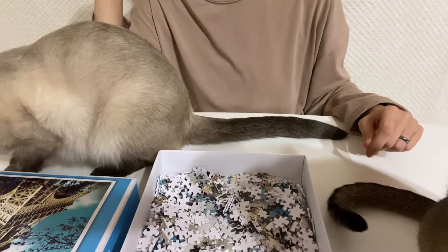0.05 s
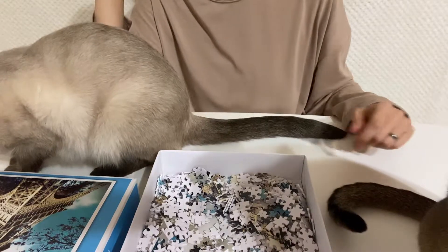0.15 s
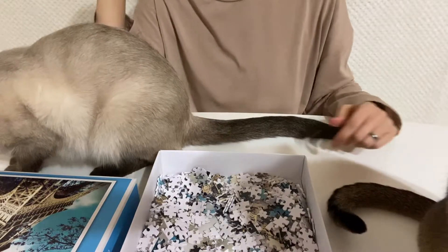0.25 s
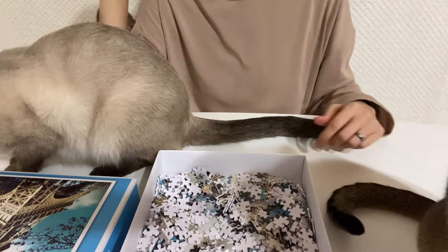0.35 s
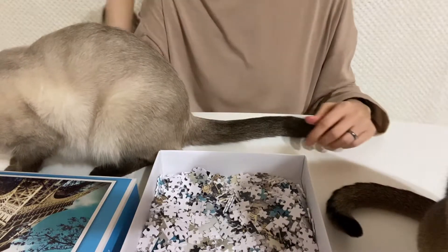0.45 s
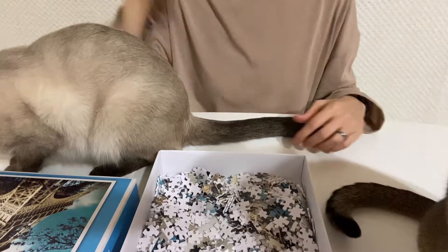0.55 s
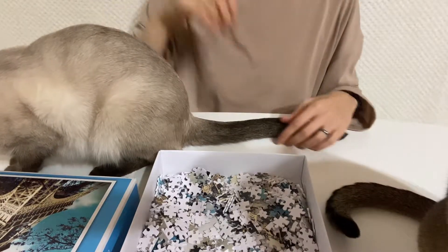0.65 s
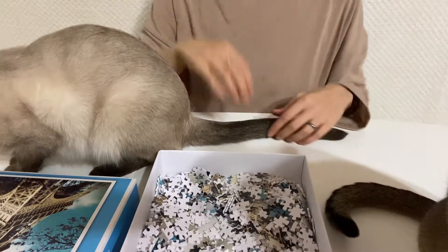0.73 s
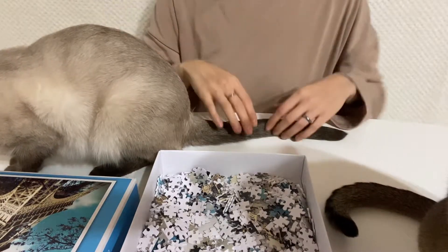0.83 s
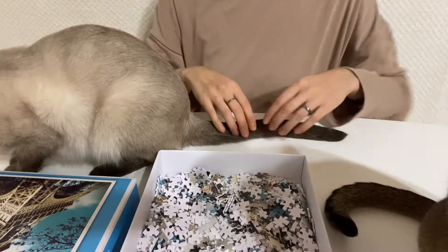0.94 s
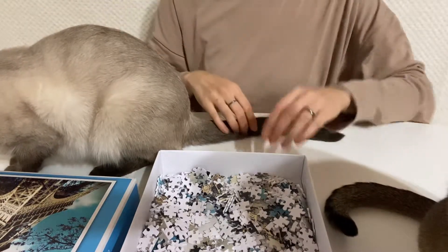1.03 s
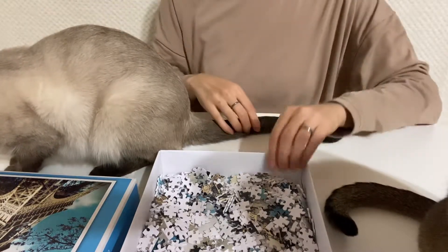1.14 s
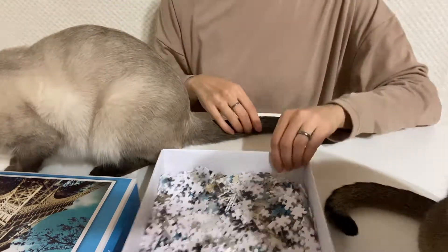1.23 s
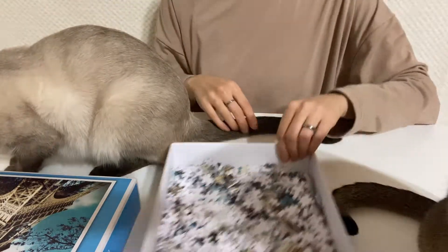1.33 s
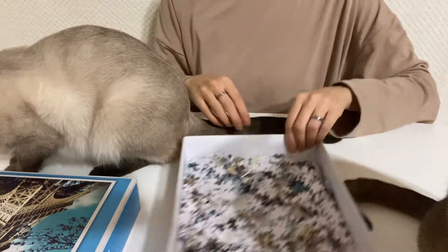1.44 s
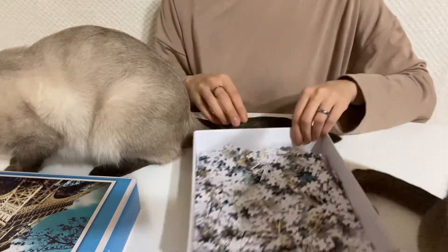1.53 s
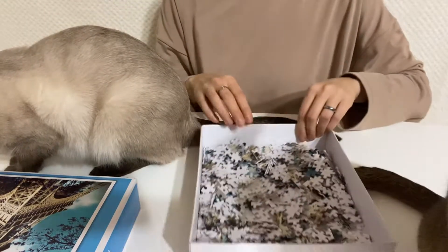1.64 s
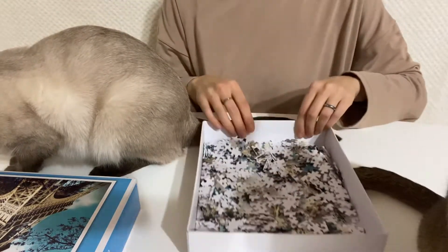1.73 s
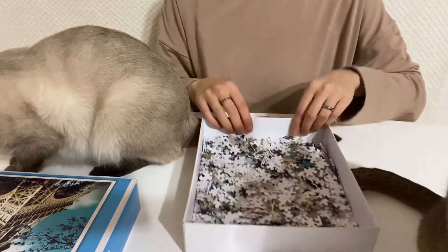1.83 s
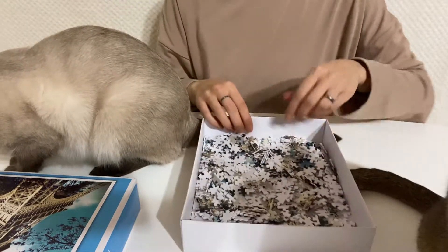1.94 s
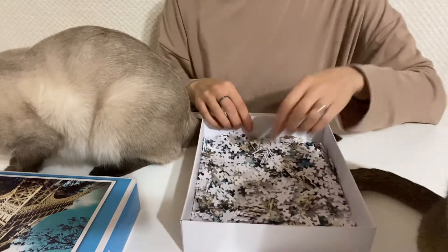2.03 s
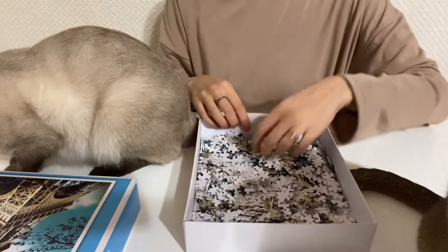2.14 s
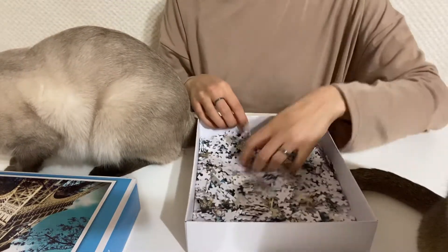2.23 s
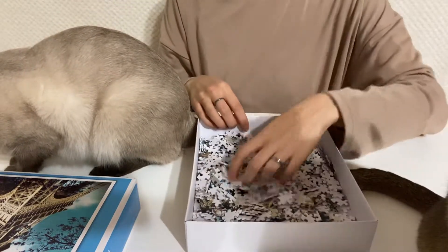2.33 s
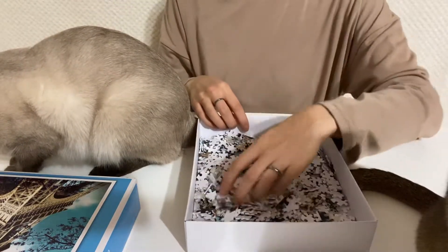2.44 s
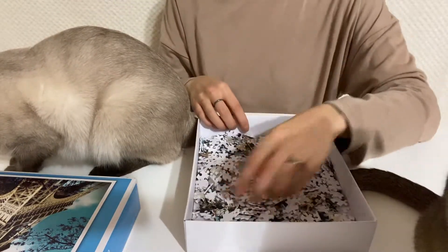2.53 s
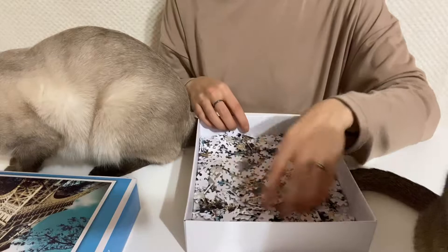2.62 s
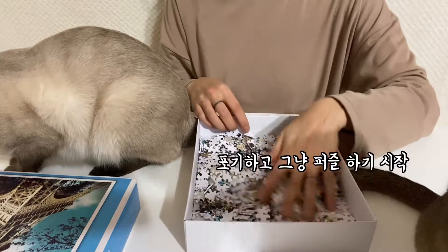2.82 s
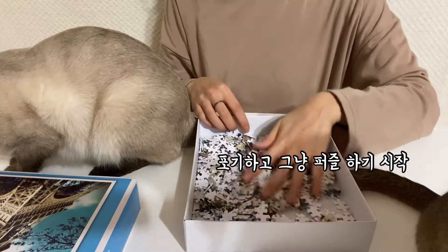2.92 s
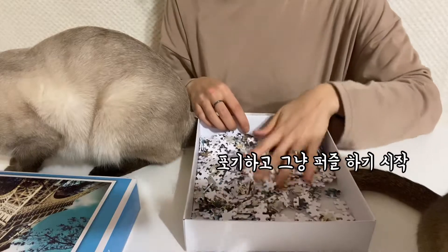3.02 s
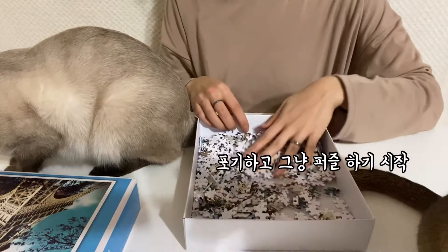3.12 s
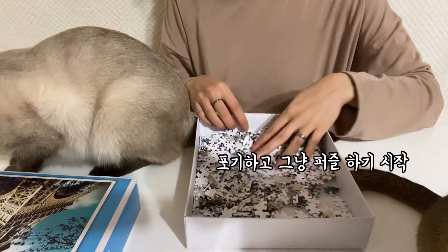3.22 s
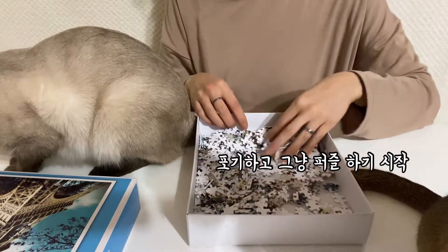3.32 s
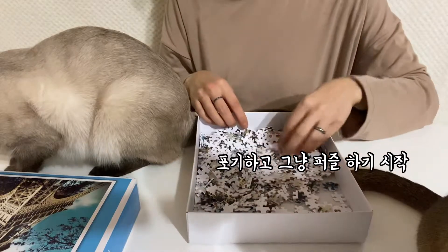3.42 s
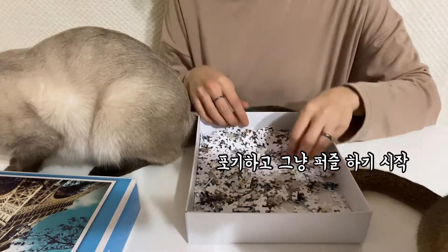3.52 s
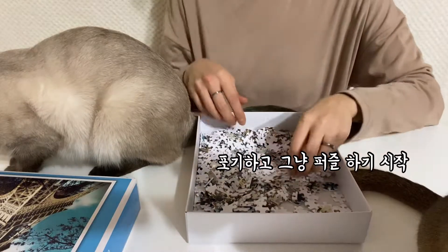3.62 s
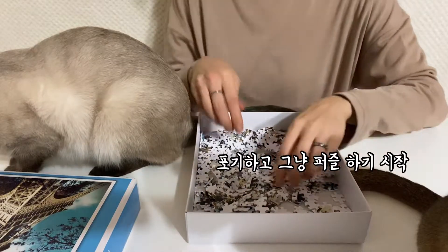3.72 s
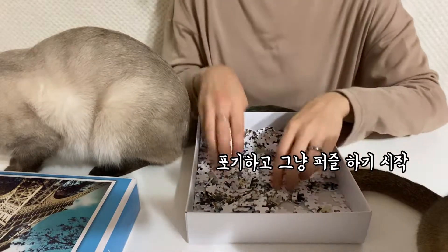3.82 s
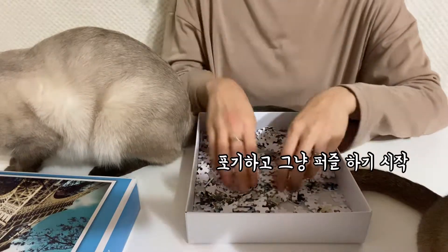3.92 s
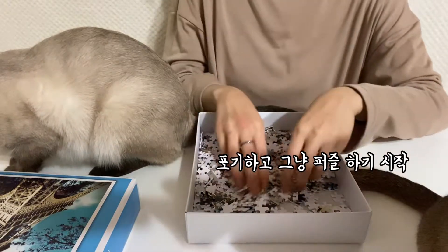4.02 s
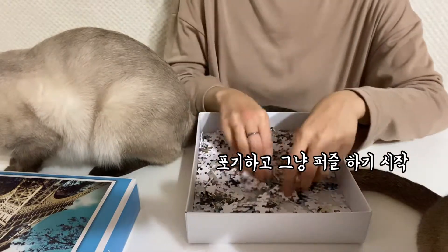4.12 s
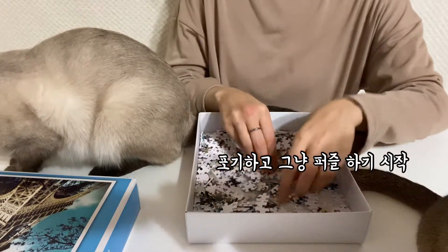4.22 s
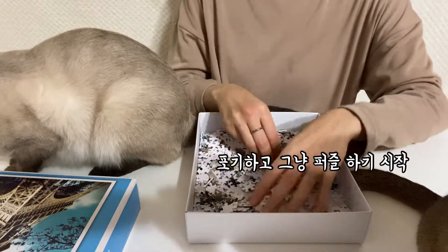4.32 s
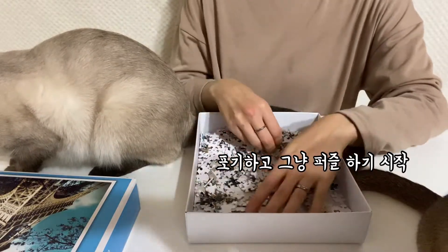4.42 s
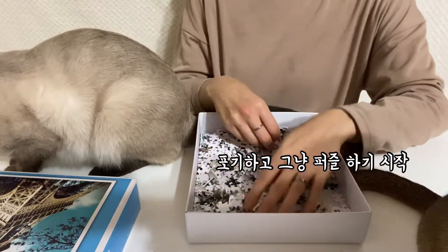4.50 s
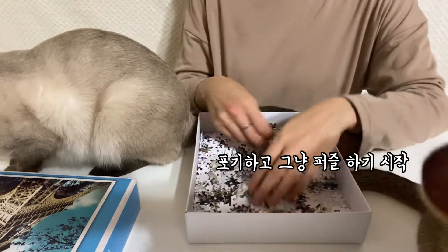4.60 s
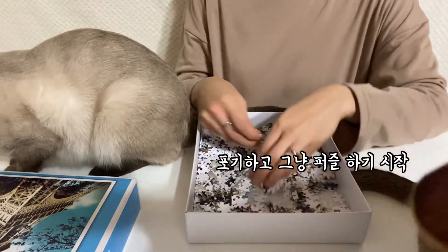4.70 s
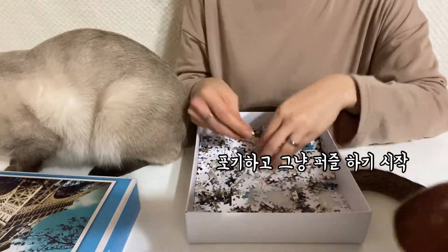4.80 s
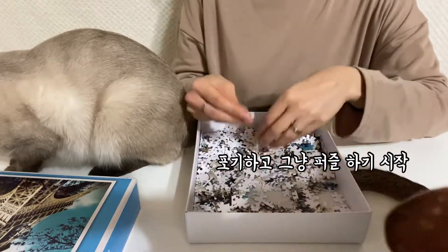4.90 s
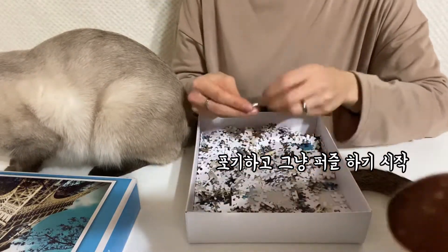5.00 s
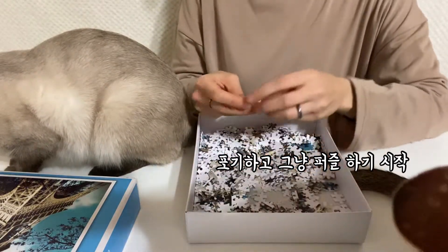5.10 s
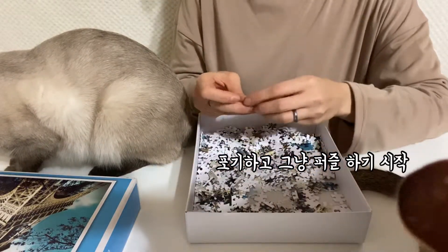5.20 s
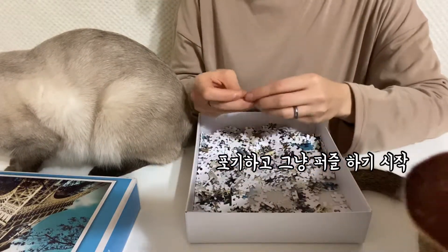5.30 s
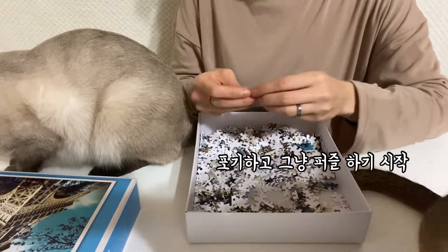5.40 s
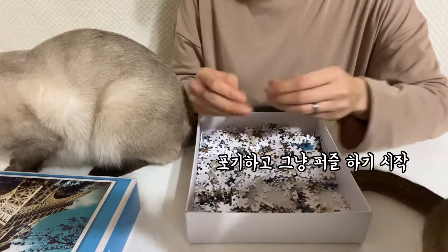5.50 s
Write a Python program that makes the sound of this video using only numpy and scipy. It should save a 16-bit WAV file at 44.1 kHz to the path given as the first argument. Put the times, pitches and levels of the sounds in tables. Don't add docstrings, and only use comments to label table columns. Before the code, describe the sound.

A quiet indoor room with faint, low room tone, heard close in stereo. During the first 0.8 seconds a sleeve rubs softly on a table, with dull wrist bumps, a tiny ring tick and a low table boom. From about 1.1 to 1.9 seconds a cardboard box is pulled closer: a fine, grainy scrape, a thin squeak near 1.2 to 1.35 with a shrill end, a few pieces jolting, and a lower squeak around 1.7 to 1.8. At 2.1 fingers plunge into loose jigsaw pieces, and a dense, loud, papery clatter bursts out, strongest until about 2.9. Further pushes and sweeps follow, with sharp clicks, cracks and hollow box taps. The clatter dips around 3.6 to 3.85, then rises again between 3.9 and 4.7 in shorter strokes. Last light ticks fade by 4.95, leaving near silence and a barely audible rub around 5.3.

```python
import sys
import numpy as np
from scipy import signal
from scipy.fft import rfft, irfft
from scipy.io import wavfile
from scipy.ndimage import uniform_filter1d

SR = 44100
rng = np.random.default_rng(int(sys.argv[2]) if len(sys.argv) > 2 else 0)


def elevation(decibels):
    levels = np.asarray(decibels, float)
    return 10 ** (levels / 20)


def int16_out(signal):
    q = np.round(np.clip(np.atleast_2d(signal).T, -1, 1) * 32767)
    wavfile.write(sys.argv[1], SR, q.astype(np.int16))


N = 244755
HZ = np.fft.rfftfreq(4096, 1 / SR)

# mode_hz, width_hz, level_db
BOX = [(364, 40, -16.5), (510, 31, 4), (697, 40, 9.5), (770, 32, 7), (1095, 30, -0.5), (2297, 160, -11),
       (3500, 530, -5.5)]


def stirring():
    # frequency_hz, density_db (per Hz)
    card_colour = [(100, -35), (200, -13), (300, 0), (700, -11), (1500, 1), (2100, 7), (3000, 9.5),
                   (4000, 9), (5200, 5.5), (6500, -7.5), (8000, -6), (10000, -7), (14000, -9),
                   (16000, -13.5)]
    drive = contacts(per_s=2200, spread_db=3.5, t60=0.0098, lag=2.7, lag_spread=3.3,
                     hiss=0.42, pitched=0.45, clump_db=2.5, cap=3.18)
    return played(drive, card_colour, hands(), dull_db=-70.0, dulling=0.69, modes=BOX, trim_db=(1.4, .4, 2.5))


def hands():
    # start_s, effort_db, fall_s (per 20 dB),
    # drumming_db and tick_db (relative to effort)
    scoops = [(2.1, -30.5, 0.5141, -9, -4), (2.19, -29, 0.25, -10.5, -4), (2.662, -38, 0.14, -5, -6),
              (2.726, -29.5, 0.53, -10.5, -6.5), (2.798, -37, 0.44, -8, -1.5),
              (3.028, -39, 0.1846, -7.5, -1.5), (3.313, -38.5, 0.15, -14, -4),
              (3.789, -46.5, 0.14, -6, -6.5), (3.894, -40, 0.42, -6.5, -3.5),
              (3.953, -36.5, 0.2943, -5.5, 0), (4.156, -42.5, 0.23, -3, 0.5), (4.525, -37, 0.24, -14, -2),
              (4.694, -51, 0.1, -9, -6.5)]
    # stop_s, effort_db, rise_s (per 20 dB), drumming_db, tick_db
    stops = [
        (2.417, -36, 0.0073, -8.5, -25),
        (2.997, -33.5, 0.24, -3, -1.5),
        (3.258, -37.5, 0.06, -5.5, 1.5),
        (3.594, -42.5, 0.43, -8, -4.5),
        (3.699, -51.5, 0.27, -8, -8),
        (4.315, -33.5, 0.2, -6.5, -4.5),
        (4.607, -32.5, 0.26, -10.5, -3),
    ]
    # peak_s, effort_db, rise_and_fall_s (per 20 dB), drumming_db, tick_db
    swells = [
        (2.309, -26, 0.0973, -9, -2),
        (2.623, -40.5, -0.05, -5, -30),
        (2.703, -26.5, 0.0546, -12.5, -9),
        (3.372, -33.5, 0.2026, -14, -4.5),
        (3.988, -39.5, 0.0128, -3, 3),
        (4.466, -41.5, 0.3052, -4, -13.5),
        (4.704, -35, 0.1314, -7, 0),
        (4.802, -40.5, 0.0839, -9, 1.5),
        (4.922, -68.5, -0.17, 12, -10.5),
    ]
    plunge_s, stop_s = 0.0075, 0.037
    return np.transpose([(s, db, plunge_s, span, *rest) for s, db, span, *rest in scoops]
                        + [(s, db, span, stop_s, *rest) for s, db, span, *rest in stops]
                        + [(s, db, span, span, *rest) for s, db, span, *rest in swells])


def contacts(per_s, spread_db, t60, lag, lag_spread, hiss, pitched, clump_db, cap=5):
    size = elevation(spread_db * np.minimum(rng.exponential(1, N), cap)) * (rng.random(N) < per_s / SR)

    spells = evened(uniform_filter1d(rng.standard_normal((N // 128 + 1, 25)), 4, 0))
    spells = elevation(clump_db * (spells[:, :24] + .5 * spells[:, 24:]))
    slow = uniform_filter1d(rng.standard_normal(spells.shape), 30, 0)
    drift = evened(uniform_filter1d(slow, 4, 1))
    spells = spells * elevation(0.71 * clump_db * drift)
    spot = rng.integers(0, 24, N)
    size *= spells[np.arange(N) // 128, spot]

    out, t = np.zeros((2, N)), np.arange(900) / SR
    for k, (u, v, w) in enumerate(rng.random((24, 3))):
        snap = rng.standard_normal((2, 900)) * elevation(-60 * t / (t60 * (.5 + u)))
        tone = pitched * ring(600 * 11 ** ((k + w) / 24), 1.6 * t60, size=900)
        pair = np.array([snap[0], 0.36 * snap[0] + 0.23 * snap[1]]) + tone
        hits = signal.oaconvolve((size * (spot == k))[None], pair, axes=1)[:, :N]
        far_lag = round(lag + lag_spread * (v - .5))
        out += [elevation(2 * w) * hits[0], np.roll(hits[1], far_lag)]
    a, b = rng.standard_normal((2, N))
    return evened(out) + hiss * np.array([a, 0.64 * np.roll(a, round(lag)) + 1.55 * b])


def played(drive, colour, table, dull_db, dulling, modes=(), trim_db=(2, 2, 2), moving=1):
    peaks = 1 + sum(elevation(db) / np.sqrt(1 + (2 * (HZ - hz) / width) ** 2) for hz, width, db in modes)
    sound = coloured(drive, read(colour, HZ) + 20 * np.log10(peaks))
    box, card, tick = split(sound, 1350, 5900)

    floor_shared, floor_left_db = 0.3, 0.9
    box = (1 - floor_shared) * box + floor_shared * box[0]
    box = box * elevation(floor_left_db * np.array([[1], [-1]]))

    s, effort_db, rise_s, fall_s, box_db, *tick_db = table
    effort = strokes(s, effort_db, rise_s, fall_s)
    bright = strokes(s, effort_db + sum(tick_db), rise_s, fall_s)
    bright = bright * (effort / (effort + elevation(dull_db))) ** dulling
    drumming = strokes(s, effort_db + box_db, rise_s, fall_s)
    box_gain, card_gain, tick_gain = elevation(trim_db)
    return box_gain * drumming * box + card_gain * effort * card + tick_gain * bright * moving * tick


def knocks():
    # start_s, peak_db, ring_hz, tick_db
    pieces = [(2.1013, -25.5, 3120, -5), (2.155, -12.5, 3060, 1), (2.2, -22.5, 2460, -9.5),
              (2.3003, -12.5, 7600, -14), (2.3123, -16, 2460, -21), (2.391, -16.5, 3360, 0),
              (2.4194, -16, 3740, -26.5), (2.4758, -17, 4020, -1.5), (2.57, -25, 3530, -14.5),
              (2.609, -25, 2280, -20), (2.6613, -21, 3350, -13.5), (2.8043, -12, 3100, -23.5),
              (2.9224, -13, 3830, -6), (2.973, -17, 2560, -17), (3.258, -24.5, 3650, -2),
              (3.3083, -15, 3080, -10.5), (3.3513, -10, 3280, -5.5), (3.421, -19.5, 2850, -28),
              (3.5868, -24.5, 3240, -6.5), (3.7112, -29.5, 3100, -37), (3.783, -18.5, 3560, -7),
              (3.8031, -25, 3400, -33), (3.9, -23, 7160, -10.5), (3.9492, -21.5, 1810, -2.5),
              (4.149, -23.5, 6000, -2), (4.3042, -16.5, 2780, -21), (4.4674, -22.5, 3020, -4),
              (4.5929, -13.5, 2970, -0.5), (4.691, -29, 2320, -15), (4.712, -15.5, 7400, -7),
              (1.167, -40, 1600, 2), (1.1, -39.5, 1750, -20), (1.4315, -25.5, 7600, -5),
             (1.461, -34, 6400, -4), (1.672, -26, 3500, -18), (1.6766, -21, 2400, -23),
             (1.6996, -26, 6500, -25), (1.7196, -29, 7300, -21), (1.8185, -45.5, 900, -20),
             (2.0631, -47, 7000, 12), (2.136, -24.5, 3000, -2), (4.6, -30, 3500, 1), (2.559, -44, 2800, 0),
             (2.584, -41, 3400, 3.5), (2.624, -36.5, 2950, 3.5), (4.5622, -24, 2500, -4),
             (4.918, -37.5, 3750, 4)]
    rise_s = 0.00092
    thud_db, thud_per_tick = -22.5, 0.89
    out, t = np.zeros((2, N)), np.arange(2000) / SR
    edge = signal.butter(2, [4600, 12000], "band", fs=SR)
    landings = pieces
    for (s, db, hz, tick_db), (u, v, w) in zip(landings, rng.random((len(landings), 3))):
        crack = rng.standard_normal(2000) * (elevation(-60 * t / .008) + .1 * elevation(-60 * t / .04))
        around_pitch = signal.butter(2, [.55 * hz, 1.6 * hz], "band", fs=SR)
        face = signal.lfilter(*around_pitch, crack)
        tick = signal.lfilter(*edge, crack)
        piece = .55 * ring(hz, .012) + .3 * ring(hz * (.6 + .2 * u), .011) + .5 * face / abs(face).max()
        thud = sum(ring(f * (.95 + .1 * w), .03) for f, *_ in BOX[:5:2]) / 3
        blow = piece + elevation(tick_db + 3.5) * tick / abs(tick).max()
        blow = blow + elevation(thud_db + thud_per_tick * tick_db) * thud
        sound = elevation(db + 1.0) * np.minimum(t / rise_s, 1) * blow
        add(out[0], s, sound)
        add(out[1], s + (1 + 3 * v) / SR, .8 * sound)
    return out


def clicks():
    # start_s, peak_db, ring_hz
    card_clicks = [(2.1743, -21.5, 3000.0), (2.192, -21.5, 2810.0), (2.2917, -18.5, 3110.0),
                   (2.4103, -21, 3260.0), (2.4846, -28.5, 6260.0), (2.4977, -25, 3070.0),
                   (2.5046, -29, 8020.0), (2.5315, -34, 3260.0), (2.558, -40, 2790.0), (2.584, -31, 3390.0),
                   (2.5908, -39.5, 2080.0), (2.623, -29.5, 2960.0), (2.6958, -22.5, 3510.0),
                   (2.8288, -19.5, 2650.0), (2.8506, -21.5, 3790.0), (2.8956, -17, 3150.0),
                   (2.978, -19.5, 2690.0), (3.005, -23, 3050.0), (3.0747, -20, 2680.0),
                   (3.1153, -27, 3080.0), (3.1253, -24, 3660.0), (3.17, -26.5, 4100.0),
                   (3.242, -21, 3500.0), (3.2659, -24.5, 3270.0), (3.3557, -14, 2890.0),
                   (3.3751, -19.5, 3080.0), (3.4612, -30, 2640.0), (3.484, -30.5, 2230.0),
                   (3.5044, -27, 3400.0), (3.529, -24, 2210.0), (3.5462, -29.5, 3180.0),
                   (3.5602, -40, 3520.0), (3.6363, -37, 3080.0), (3.6698, -36, 3180.0),
                   (3.688, -36, 2120.0), (3.6962, -30, 3230.0), (3.7919, -36, 3570.0), (3.839, -37, 3400.0),
                   (3.8805, -45, 3790.0), (3.9285, -30.5, 3680.0), (3.9379, -33, 2820.0),
                   (3.9857, -25, 7760.0), (4.101, -29, 3150.0), (4.159, -28.5, 3310.0),
                   (4.169, -26.5, 3800.0), (4.2017, -24.5, 3430.0), (4.268, -24.0, 3420.0),
                   (4.31, -18.5, 3340.0), (4.3817, -31.5, 2340.0), (4.3938, -24, 2440.0),
                   (4.4025, -25, 2640.0), (4.4997, -23, 3480.0), (4.5384, -20, 2990.0),
                   (4.5512, -22.5, 2990.0), (4.5583, -20.5, 3350.0), (4.6, -19, 3550.0),
                   (4.7612, -22, 6900.0), (4.7913, -28.0, 7600.0), (4.84, -36, 6970.0),
                   (4.8656, -32.0, 6880.0)]
    # start_s, peak_db, ring_hz
    floor_taps = [(2.1039, -43, 810.0), (2.1326, -36, 1070.0), (2.3007, -25, 1240), (2.3241, -31.0, 595),
                  (2.3959, -31, 720.0), (2.4844, -46, 740.0), (2.6088, -33, 836), (2.7087, -28, 830.0),
                  (2.8027, -34.0, 1290.0), (2.8693, -25, 690), (2.9811, -29.0, 593), (3.0021, -45, 716),
                  (3.2497, -48, 1120.0), (3.5915, -45.5, 720), (3.6839, -55, 696), (3.71, -50.5, 756),
                  (3.7838, -53.5, 1300), (3.806, -38, 1290), (3.9512, -37.5, 726), (3.9907, -35.5, 530),
                  (4.018, -32, 1130), (4.1571, -39.0, 740), (4.2425, -34.5, 800.0), (4.3101, -30.5, 804),
                  (4.4249, -35.5, 890), (4.4737, -35.5, 750.0), (4.5244, -36, 1100), (4.5499, -24, 773),
                  (4.6008, -32.5, 1250), (4.6912, -38.5, 780.0)]
    click_db, click_t60, edge_db = -2.5, 0.008, -10
    tap_db, tap_t60, tap_rise_s = 1, 0.028, 0.0033
    out, t = np.zeros((2, N)), np.arange(2000) / SR
    for (s, db, hz), (u, v) in zip(card_clicks, rng.random((len(card_clicks), 2))):
        edge = np.diff(rng.standard_normal(2001)) * elevation(edge_db - 60 * t / click_t60)
        tone = ring(hz, click_t60 * (0.76 + .6 * u)) + 0.28 * ring(hz * (.7 + .7 * v), click_t60)
        sound = elevation(db + click_db) * (tone + edge)
        add(out[0], s, sound)
        add(out[1], max(s - (1 + 3 * v) / SR, 0), .8 * sound)
    for s, db, hz in floor_taps:
        tap = elevation(db + tap_db) * np.minimum(t / tap_rise_s, 1) * ring(hz, tap_t60)
        add(out, s, tap * [[1.15], [.85]])
    return out


def dragging():
    # start_s, effort_db, rise_s, fall_s (per 20 dB), drumming_db (relative)
    pulls = [
        (.914, -83, 0.091, 0.17, 5),
        (1.014, -79, 0.095, 0.11, 3),
        (1.099, -66.5, 0.018, 0.24, -13),
        (1.208, -43.5, 0.072, 0.55, -10.5),
        (1.336, -36.5, 0.068, 0.046, -30),
        (1.43, -48, 0.25, 0.32, -14),
        (1.684, -48, 0.15, 0.19, -4.5),
        (1.814, -57.5, 0.65, 0.021, -3.5),
        (2.02, -66.5, 0.039, 0.16, -1.5),
        (2.09, -63, 0.11, .045, -6),
    ]
    # frequency_hz, density_db (per Hz)
    slide_colour = [(100, -10.5), (300, -6), (800, -5.5), (1500, -4), (2600, -0.5), (4000, -3.5),
                    (5200, -3.5), (6700, 2), (8500, 2), (10300, -1), (12000, -6.5), (15000, -13)]
    drive = contacts(per_s=6000, spread_db=5.5, t60=0.02, lag=1.0, lag_spread=2.6,
                     hiss=0.83, pitched=.4, clump_db=-0.5)
    t = np.arange(N) / SR
    resting_db = -11
    moving = uniform_filter1d(np.where((t > 1.2) & (t < 1.83), 1, elevation(resting_db)), 800)
    return played(
        drive, slide_colour, np.transpose(pulls), moving=moving, dull_db=-81.5, dulling=.4,
        trim_db=(1.4, 1.4, 3.5))


def squeaks():
    # time_s, pitch_hz, level_db
    glides = [
        [(1.2, 1640, -52), (1.212, 1660, -47), (1.219, 1750, -58), (1.228, 1880, -48), (1.247, 1850, -60),
         (1.258, 1740, -47), (1.275, 1660, -48), (1.29, 1390, -44.5), (1.316, 1430, -45), (1.326, 1400, -60)],
        [(1.70, 650, -57), (1.712, 655, -52), (1.74, 730, -54), (1.76, 830, -48), (1.775, 800, -48),
         (1.79, 620, -52), (1.803, 430, -57)],
        [(1.305, 4250, -47), (1.318, 4000, -52), (1.326, 3800, -43), (1.335, 4050, -38), (1.347, 3200, -38)],
        [(1.33, 2700, -48), (1.34, 2400, -41), (1.348, 2050, -43)],
        [(.965, 1700, -84), (1.0, 1660, -79), (1.025, 1640, -75), (1.04, 1650, -84)],
    ]
    out = np.zeros(N)
    for rows in glides:
        s, *columns = np.transpose(rows)
        t = np.arange(s[0], s[-1], 1 / SR)
        hz, db = (np.interp(t, s, c) for c in columns)
        wobble = evened(uniform_filter1d(rng.standard_normal(len(t)), 200))
        turns = np.cumsum(hz * (1 + .015 * wobble)) / SR
        rough = 1 + .38 * evened(uniform_filter1d(rng.standard_normal(len(t)), 150))
        tone = np.sin(2 * np.pi * turns) + .1 * np.sin(4 * np.pi * turns)
        add(out, s[0], elevation(db + 2) * rough * tone)
    return out


def brushing():
    # start_s, effort_db, rise_s, fall_s (per 20 dB), drumming_db (relative)
    sleeve = [
        (0.079, -76, 0.064, 1, 10),
        (0.282, -69.5, 0.011, 0.15, 10),
        (0.459, -66, 0.38, 0.093, -15),
        (0.541, -67.5, 0.056, 0.09, 13.5),
        (0.708, -69.5, 0.44, 0.063, 8.5),
        (5.247, -84, 0.0051, 0.22, -22),
        (5.35, -84, 0.114, 0.094, -8.5),
    ]
    # frequency_hz, density_db (per Hz)
    cloth_colour = [(100, 11), (280, 8), (450, 11), (900, -10), (1600, -2.5), (3000, 6), (4600, 8.5),
                    (6000, 2), (8000, -1.5), (9500, -2.5), (12500, -14), (14500, -17.5)]
    drive = contacts(per_s=9000, spread_db=4.0, t60=0.02, lag=-1.5, lag_spread=6,
                     hiss=.8, pitched=0.2, clump_db=2)
    return played(drive, cloth_colour, np.transpose(sleeve), dull_db=-83.5, dulling=1.1, trim_db=(1.5, 1.4, 4))


def bumps():
    # start_s, peak_db, tick_db (relative), table_hz, t60_s
    touches = [(0.099, -59, -30, 483, .08), (0.36, -62, -30, 326, .12), (0.075, -58, -20, 394, 0.087),
               (0.284, -47.5, 7.5, 67.8, 0.42), (.308, -47.5, -30, 171, 0.27),
               (0.527, -48, -30, 360, 0.045), (0.548, -53, -30, 476, 0.056), (0.3, -58, -30, 560, .06),
               (0.526, -47.5, -3, 560, 0.027), (0.545, -47, -12, 299, 0.11), (0.56, -62, -30, 745, .05),
               (0.565, -64, -30, 1070, .1), (0.608, -60, -30, 980, 0.056), (0.672, -53, -30, 332, 0.045),
               (.685, -56, -20, 693, 0.053), (0.703, -55.5, -22, 970, 0.021),
               (1.674, -36.5, -31.5, 663, .07), (2.132, -37.5, -31, 224, 0.13)]
    out, t = np.zeros(N), np.arange(8000) / SR
    wood = signal.butter(2, [300, 950], "band", fs=SR)
    for s, db, tick_db, hz, t60 in touches:
        knock = signal.lfilter(*wood, rng.standard_normal(8000) * elevation(-60 * t / 0.067))
        modes = ring(hz, t60, size=8000) + .5 * ring(2.3 * hz, .4 * t60, size=8000)
        thump = modes + 1.5 * knock * (hz > 250)
        add(out, s, elevation(db) * (thump + elevation(tick_db) * ring(4700, 0.0056, size=8000)))
    return out


def boom():
    # start_s, table_db, box_floor_db
    leans = [(.11, -70, -61), (.36, -53, -61), (.53, -94, -54), (1.2, -61, -58.5), (1.7, -79, -57),
             (1.83, -57.5, -71), (2.15, -59, -36), (2.86, -52, -62), (3.03, -54.5, -53), (3.18, -61, -51.5),
             (3.32, -56, -68), (3.66, -62, -57.5), (4.0, -60.5, -44.5), (4.11, -56.5, -50.5),
             (4.25, -57, -47), (4.44, -63.5, -65), (4.7, -61.5, -50), (4.82, -69, -52.5)]
    s, table_db, floor_db = np.transpose(leans)
    shake = rng.standard_normal((2, 1, N))
    table = evened(coloured(shake[0], -20 * np.log10(1 + ((HZ - 60) / 14) ** 2)))
    floor = evened(coloured(shake[1], -20 * np.log10(1 + ((HZ - 203) / 32) ** 2)))
    floor /= np.sqrt(uniform_filter1d(floor ** 2, 2500) + .1)
    table /= np.sqrt(uniform_filter1d(table ** 2, 5000) + .15)
    table_rest_db, floor_under_stir_db = -67.5, -20
    lean = strokes(s, table_db, 0.11, 0.13) + elevation(table_rest_db)
    press = strokes(s, floor_db, 0.044, 0.21) + elevation(floor_under_stir_db) * strokes(*hands()[:4])
    return lean * elevation(np.array([[-.8], [.8]])) * table + elevation(-3.0) * press * floor


def room(x):
    # frequency_hz, t60_s
    decay = [(200, 0.63), (1000, 0.43), (4000, 0.24), (12000, 0.073)]
    taps = np.zeros((2, SR // 2))
    at = np.arange(200, SR // 2 - 20, 20) + rng.integers(0, 20, (2, (SR // 2 - 201) // 20))
    np.put_along_axis(taps, at, rng.choice([-1., 1.], at.shape), 1)
    hz, t, z = signal.stft(taps, SR, nperseg=256)
    tail = signal.istft(z * elevation(-60 * t / read(decay, hz)[:, None]), SR, nperseg=256)[1]
    return signal.fftconvolve(x.mean(0)[None], tail / np.linalg.norm(tail[0]), axes=1)[:, :N]


def hush():
    # frequency_hz, density_db (per Hz)
    hush_colour = [(25, -24), (60, -20), (110, -9), (171, -13), (414, -15.5), (571, -32.5), (695, -17),
                   (800, -27.5), (1380, -31), (3700, -38.5), (6000, -44.5), (9000, -44.5), (13000, -43.5),
                   (16000, -55)]
    hush_db = -71
    a, b, c = rng.standard_normal((3, N))
    shared = coloured(c[None], -12 * np.log2(1 + HZ / 150) + 7.5)
    return elevation(hush_db + 1.5) * evened(coloured(np.array([a, b]) + shared, read(hush_colour, HZ)))


def strokes(s, db, rise_s, fall_s):
    at = np.arange(0, N, 64)
    late = at[:, None] / SR - s
    slope = np.where(late < 0, late / np.maximum(rise_s, .002), -late / np.maximum(fall_s, .005))
    gain = np.sqrt((elevation(np.maximum(db + 20 * slope, -200)) ** 2).sum(1))
    return np.interp(np.arange(N), at, gain)


def ring(hz, t60, size=2000):
    t = np.arange(size) / SR
    return elevation(-60 * t / t60) * np.sin(2 * np.pi * hz * t)


def split(x, low_hz, high_hz):
    hz, z = np.fft.rfftfreq(N, 1 / SR), rfft(x)
    low = 1 / (1 + (hz / low_hz) ** 6)
    high = 1 - 1 / (1 + (hz / high_hz) ** 16)
    return [evened(irfft(z * part, N)) for part in (low, 1 - low - high, high)]


def coloured(x, db):
    log_gain = np.maximum(db, -100) * np.log(10) / 20
    circle = np.concatenate([log_gain, log_gain[-2:0:-1]])
    taps = np.fft.ifft(np.exp(np.conj(signal.hilbert(circle)))).real
    return signal.oaconvolve(x, taps[None], axes=1)[:, :x.shape[1]]


def read(points, hz):
    f, value = np.transpose(points)
    return np.interp(np.log(hz + 1), np.log(f + 1), value)


def evened(x):
    return x / np.sqrt(np.mean(x ** 2) + 1e-20)


def add(mix, s, sound):
    part = mix[..., round(s * SR):][..., :sound.shape[-1]]
    part += sound[..., :part.shape[-1]]


def scene():
    near = stirring() + knocks() + clicks() + dragging() + squeaks() + brushing() + bumps()
    return near + elevation(-8.5) * room(near) + boom() + hush()


def thrifty(mid, side):
    hz, t, z = signal.stft(np.roll([mid, side], -316, 1), SR, "cosine", 2048, 1024)
    power = (abs(z[:, :1024]) ** 2).reshape(2, 64, 16, -1).sum(2)
    band_hz = hz[8:1024:16, None]
    margin_db = np.interp(band_hz, [8000, 9000, 10000, 11200, 13500, 14500], [-12, -7, -5, -5.5, -6, -2])
    margin_db = margin_db + 2.2 * rng.standard_normal(power.shape[1:])
    weaker = power < power[::-1] * elevation(2 * margin_db)
    dropped = weaker & (band_hz > 6300) | (band_hz > 15850)

    quick, slow = (uniform_filter1d(np.diff(mid + side) ** 2, size) for size in (100, 600))
    jump = np.maximum.reduceat(quick[400:] / (slow[:-400] + 1e-12), np.arange(316, N - 1500, 1024))
    steady = np.pad(np.convolve(jump > 10, [1, 1]) == 0, (0, 4), "edge")[:len(t)]
    z[:, :1024] *= ~np.repeat(dropped & steady, 16, 1)

    treble = (hz > 6300)[:, None]
    z[1] *= (1 + .3 * treble) * np.exp(1j * 1.2 * treble * rng.standard_normal(z[1].shape))
    return np.roll(signal.istft(z, SR, "cosine", 2048, 1024)[1][:, :N], 316, 1)


def top_cut(x):
    return signal.sosfilt(signal.butter(12, 16480, fs=SR, output="sos"), x)


def record(dry):
    # (half of it raises the side, above 6.2 kHz half lowers
    side_width = [(60, 7), (110, 9), (200, -5.5), (400, 0.5), (1300, 2), (3000, 2), (5500, 1.5)]
    hz, z = np.fft.rfftfreq(N, 1 / SR), rfft(dry)
    single = np.clip((hz - 6100) / 250, 0, 1)
    turn = np.exp(1j * np.pi * (hz - 7150) / 5750)
    one_capsule = z[0] * np.array([1 / turn, turn]) + .13 * z[1] * [[1], [0]]
    both = (1 - single) * z + single * one_capsule
    left, right = both / (1 + (hz / 15800) ** 60) / (1 + (36 / (hz + 1)) ** 4)
    narrowed = (left - right) * elevation((0.5 - single) * read(side_width, hz))
    mid, side = thrifty(irfft(left + right, N) / 2, irfft(narrowed, N) / 2)
    return top_cut(np.array([mid + side, mid - side]))


dry = scene()
out = record(dry)
int16_out(out)
```